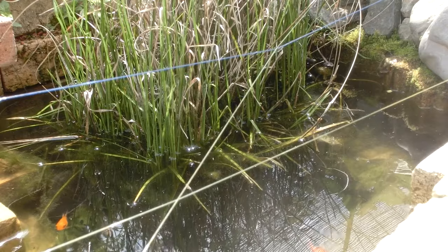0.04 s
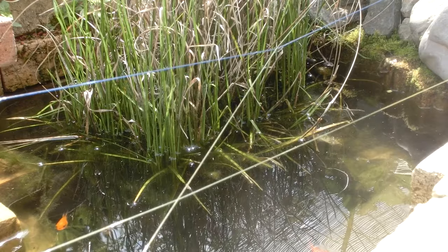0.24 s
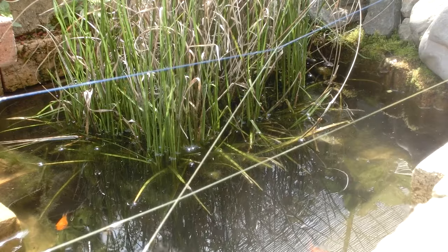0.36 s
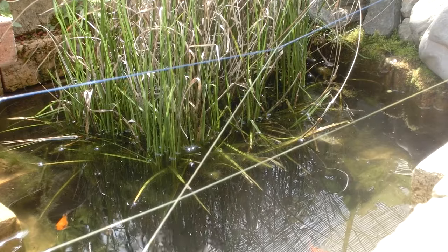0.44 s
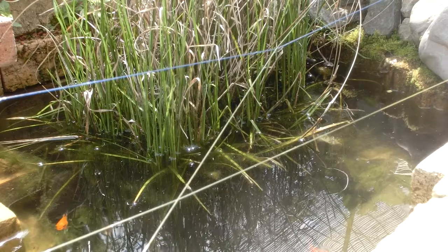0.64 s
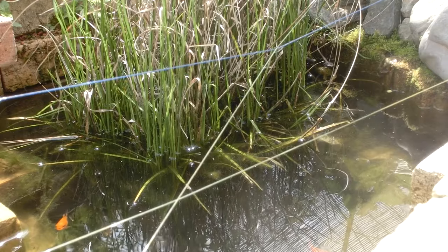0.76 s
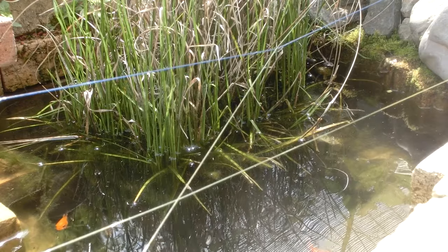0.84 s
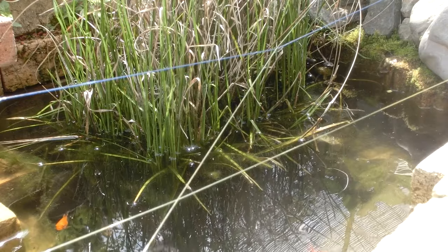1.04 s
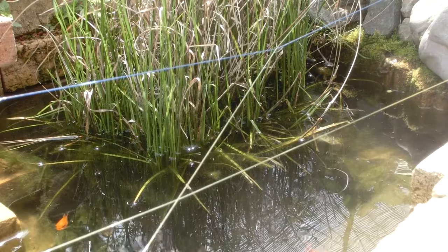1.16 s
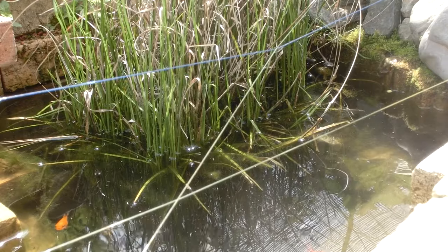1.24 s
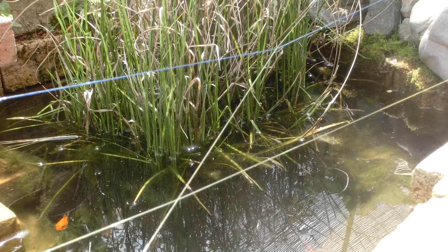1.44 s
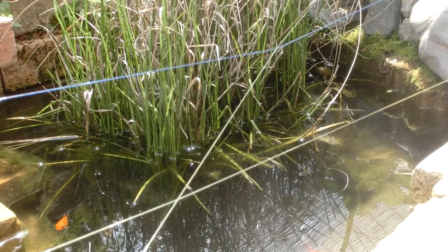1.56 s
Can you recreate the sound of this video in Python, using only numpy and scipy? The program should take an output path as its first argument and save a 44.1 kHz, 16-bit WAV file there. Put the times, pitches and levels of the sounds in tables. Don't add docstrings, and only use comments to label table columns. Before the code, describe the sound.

A frog gives one short rattling croak beside a garden pond, over faint outdoor hush

```python
import sys
import numpy as np
from scipy import signal
from scipy.fft import rfft, irfft
from scipy.io import wavfile
from scipy.ndimage import uniform_filter1d

SR = 44100
rng = np.random.default_rng(int(sys.argv[2]) if len(sys.argv) > 2 else 0)


def inscribe(sig):
    pcm = np.round(np.clip(np.atleast_2d(sig).T, -1, 1) * 32767)
    wavfile.write(sys.argv[1], SR, pcm.astype(np.int16))


def volts_from_decibels(level):
    exponent = np.asarray(level, float) / 20
    return 10 ** exponent


N = 70560

# f/Hz, level/dB, T60/ms
RASP_MODES = [(4530, -33, 1), (5710, -26, 1.8), (6640, -37.5, 5.3), (8400, -30.5, 1.48), (9620, -32.5, 2),
              (13100, -39, 1.1)]


def ring(x, hz, t60_ms):
    r = np.exp(-np.log(1000) / (t60_ms / 1000 * SR))
    return signal.lfilter([1], [1, -2 * r * np.cos(2 * np.pi * hz / SR), r * r], x)


def ring_twice(x, hz, t60_ms):
    return ring(ring(x, hz, t60_ms), hz, t60_ms)


def peak(x, db):
    return x * volts_from_decibels(db) / np.abs(x).max()


def cut(x, hz, kind, order=2):
    return signal.sosfilt(signal.butter(order, hz, kind, fs=SR, output="sos"), x)


def sides(db):
    return volts_from_decibels(np.array([[db / 2], [-db / 2]]))


def walk(rate):
    k = int(SR / rate)
    steps = np.repeat(rng.standard_normal(N // k + 1), k)
    wander = uniform_filter1d(uniform_filter1d(steps, k), k)[:N]
    return wander / wander.std()


def click(sac_hz, effort_db, slack, upper_db, throat_ms, chance, rasp):
    impulse = np.eye(1, len(rasp))[0]
    push = cut(cut(impulse, 2000, "low"), 520, "high", order=3)

    mouth = peak(ring_twice(push, 3080, 0.75), -5.8 - 59 * slack)
    throat = ring(push, sac_hz * 0.81 * (1 - slack), throat_ms)
    sac = peak(ring(throat, sac_hz * 1.13, 9.5), 0)
    cheek = peak(ring_twice(push, 830, 9), -30)
    skull_hz = 3360 * (1 + 0.016 * chance[0])
    skull = peak(ring_twice(cut(impulse, 3400, "high"), skull_hz, 1.9), upper_db - 4.5)
    belly = peak(ring(cut(impulse, 270, "low"), 174, 57), -50.5)
    reed_hz = 2853 * (1 + 0.038 * chance[1])
    reed = peak(ring_twice(cut(impulse, 2850, "high"), reed_hz, 6.3), -24.5)
    out = mouth - sac + cheek - skull + belly + reed

    rasp_t60_ms = 6
    decay = volts_from_decibels(-60 * np.arange(len(rasp)) / SR * 1000 / rasp_t60_ms)
    rasp = cut(rasp * decay, 3800, "high")
    rasp_db = 0.61 * effort_db - 45 * slack
    for (hz, db, t60_ms), c in zip(RASP_MODES, chance[1:]):
        out = out + peak(ring_twice(rasp, hz * (1 + 0.015 * c), t60_ms), db + 2 * c + rasp_db)
    return out / np.abs(out).max()


def yard():
    t60_s, start_s, side_gain, level_db = 0.29, 0.005, 0.27, -22
    t = np.arange(SR // 2) / SR
    envelope = volts_from_decibels(-60 * t / t60_s) * np.clip(t / start_s - 1, 0, 1)
    mid, side = rng.standard_normal((2, len(t))) * envelope
    tail = cut(mid + side_gain * side * np.array([[1], [-1]]), 1300, "low", order=1)
    tail = tail - 0.6 * cut(tail, (1400, 1900), "band", order=1)
    return tail * volts_from_decibels(level_db) / np.sqrt(np.sum(tail ** 2) / 2)


def frog():
    # t/s, peak level/dB, sac f/Hz, upper resonance level/dB, throat T60/ms
    clicks = [(0.1281, -32.5, 1740, -9, 4.2), (0.1557, -31.5, 1680, -8, 5), (0.1758, -29, 1750, -9, 7.7),
              (0.1931, -20.5, 1670, -14, 4.6), (0.2276, -14, 1740, -23, 4.2),
              (0.2481, -12.5, 1730, -23, 4.5), (0.2723, -16, 1820, -11, 1.9), (0.285, -10, 1705, -15, 3.9),
              (0.3056, -11.5, 1855, -15, 3), (0.3217, -7.5, 1736, -18, 5.3), (0.3421, -10, 1750, -17, 2.7),
              (0.36, -8.5, 1745, -22, 4), (0.3787, -8.5, 1720, -27, 4), (0.3975, -9, 1632, -39, 3.6),
              (0.4164, -8.5, 1690, -51, 5.1), (0.4378, -11.5, 1655, -44, 3.5),
              (0.4554, -14, 1556, -6.5, 4.6)]
    # delay/ms, level/dB, left minus right/dB,
    # polarity
    reflections = [(1.74, -7.2, .3, 1), (2.8, -25, -8, -1), (3.73, -19.3, .4, -1), (4.47, -22.5, -.5, -1),
                   (5.16, -27, 0, -1), (6.22, -30, 0, 1), (8.2, -25, -.8, -1),
                   (.42, -22, -20, 1),
        (11.8, -29, 1.5, 1),
        (16.4, -22, -1.2, -1),
        (35.5, -30, 2, 1),
    ]
    echoes = reflections
    loud_db, level_db, rise_s = -8, -2, 0.0008
    slack_from_s, slack_per_s = 0.41, 0.94

    near, voice = np.zeros((2, N)), np.zeros(N)
    chance = rng.standard_normal((len(clicks), 1 + len(RASP_MODES) + len(echoes)))
    rasps = rng.standard_normal((len(clicks), 2048))
    for (s, db, sac_hz, upper_db, throat_ms), c, rasp in zip(clicks, chance, rasps):
        slack = slack_per_s * max(s - slack_from_s, 0)
        x = click(sac_hz, db - loud_db, slack, upper_db, throat_ms, c, rasp) * volts_from_decibels(db + level_db)
        i = int((s + rise_s) * SR)
        voice[i:i + len(x)] += x
        for (ms, echo_db, pan_db, polarity), e in zip(echoes, c[-len(echoes):]):
            j = i + round(ms / 1000 * SR)
            near[:, j:j + len(x)] += polarity * x * volts_from_decibels(echo_db + 0.8 * e) * sides(pan_db)
    reverberation = signal.fftconvolve(voice[None], yard(), axes=1)[:, :N]
    return (voice + near) * sides(-0.9) + reverberation


def plop():
    start_s, hz, t60_ms, level_db = 0.478, 355, 26, -50
    push = np.zeros(N)
    push[int(start_s * SR)] = 1
    return peak(ring_twice(push, hz, t60_ms), level_db)


def hum():
    hz, level_db, octave_db = 271.3, -59.5, -2
    peak_s, rise_s, fall_s = 1.108, 0.16, 0.11
    t = np.arange(N) / SR - peak_s
    phase = 2 * np.pi * np.cumsum(hz * (1 + 0.0058 * walk(11.76))) / SR
    swell = np.exp(-np.abs(t) / np.where(t < 0, rise_s, fall_s))
    swell = swell * volts_from_decibels(level_db + 2.6 * walk(14.05))
    return swell * (np.sin(phase) + volts_from_decibels(octave_db) * np.sin(2 * phase))


def air():
    # f/Hz, level/dB per Hz
    spectrum = [(30, -14.5), (90, -16), (150, -17.5), (280, -7), (650, -6), (1400, -15.5), (3500, -24),
                (14500, -29)]
    # f/Hz, side minus mid level/dB
    width = [(60, -3), (110, -6), (200, -7), (380, -10), (700, -11), (1290, -6.5), (2380, -3), (4400, 0.5),
             (8120, 1), (15000, 1.5)]
    level_db, swell_db, flicker_db = -55, 0.35, 0.4
    log_f = np.log(np.maximum(np.fft.rfftfreq(N, 1 / SR), 1))

    def curve(table):
        hz, db = np.transpose(table)
        return volts_from_decibels(np.interp(log_f, np.log(np.maximum(hz, 1)), db))

    noise = rfft(rng.standard_normal((2, N))) * curve(spectrum)
    noise = noise * np.array([np.ones(len(log_f)), curve(width)])
    half_octave = np.log(2) / 2
    out, swell = 0, walk(2.4)
    for centre in np.arange(np.log(20), np.log(SR / 2), half_octave):
        share = np.cos(np.pi / 2 * np.clip((log_f - centre) / half_octave, -1, 1)) ** 2
        out = out + irfft(noise * share, N) * volts_from_decibels(swell_db * swell + flicker_db * walk(9.2))
    mid, side = out * volts_from_decibels(level_db) / out[0].std()
    return np.array([mid + side, mid - side]) * sides(-1.5)


def scene():
    return frog() + plop() + air() + hum()


def top_cut(x):
    return signal.sosfilt(signal.butter(12, 16470, fs=SR, output="sos"), x)


def record(dry):
    top = signal.ellip(8, 0.2, 70, 15600, fs=SR, output="sos")
    return top_cut(signal.sosfilt(top, dry))


dry = scene()
out = record(dry)
inscribe(out)
```